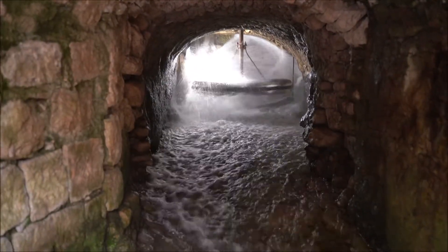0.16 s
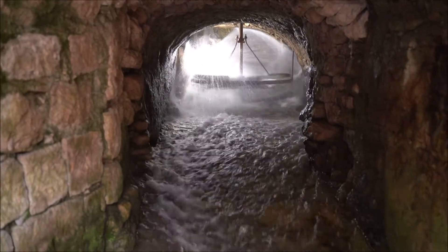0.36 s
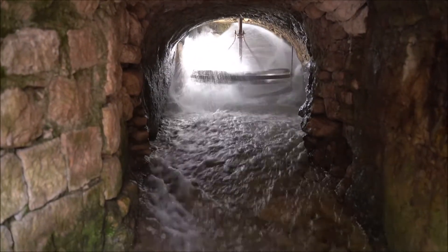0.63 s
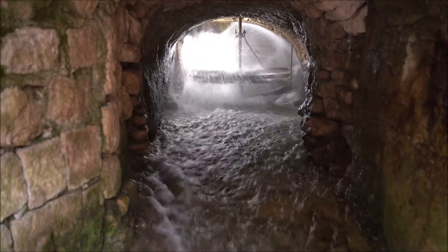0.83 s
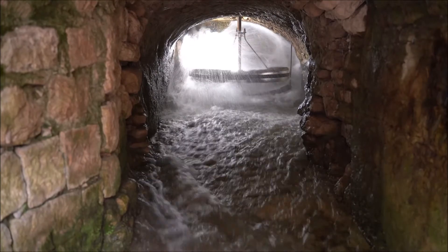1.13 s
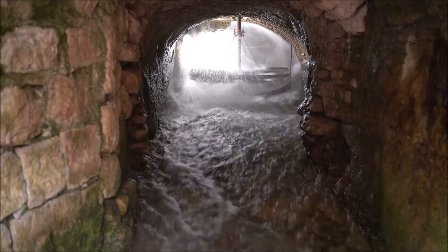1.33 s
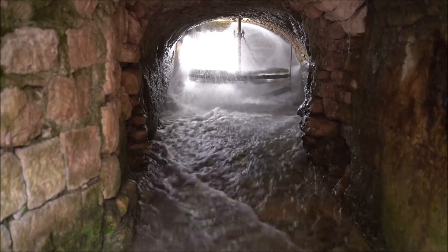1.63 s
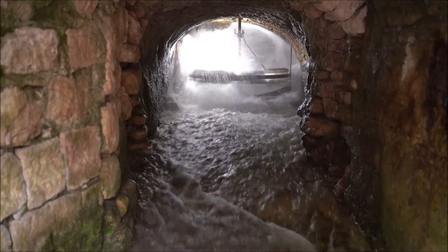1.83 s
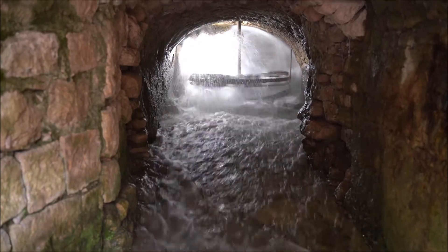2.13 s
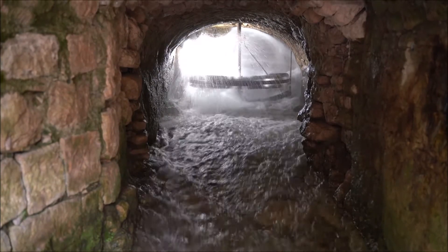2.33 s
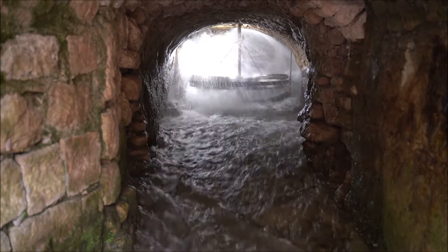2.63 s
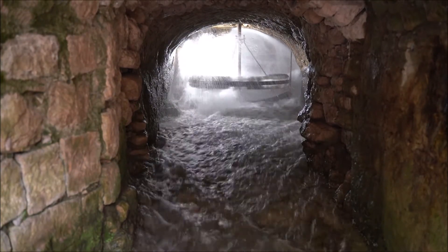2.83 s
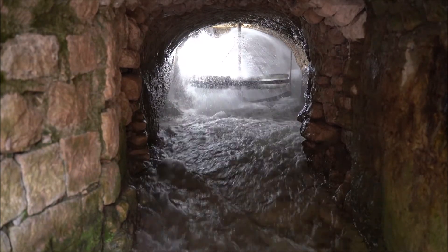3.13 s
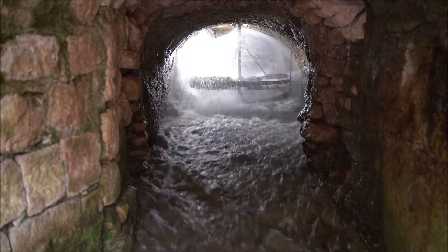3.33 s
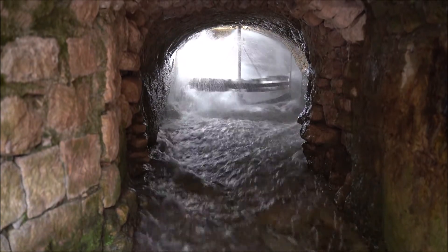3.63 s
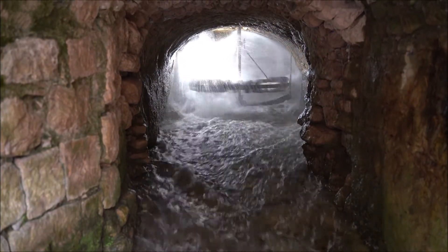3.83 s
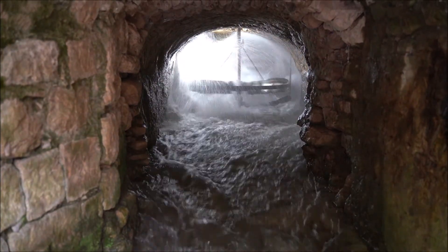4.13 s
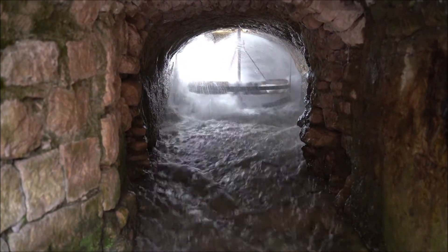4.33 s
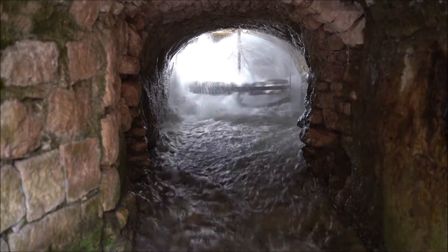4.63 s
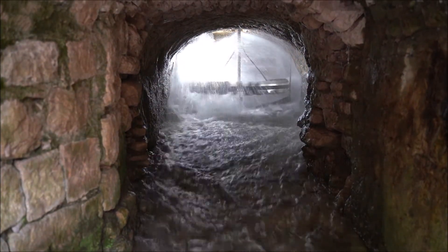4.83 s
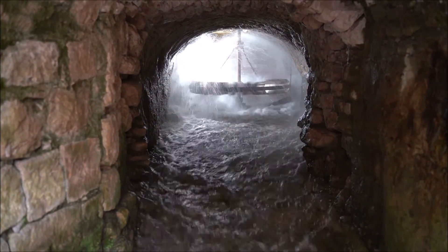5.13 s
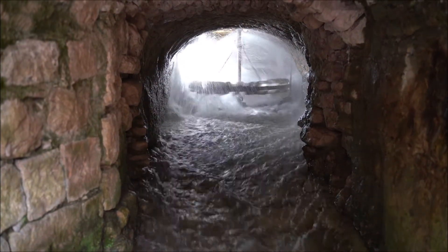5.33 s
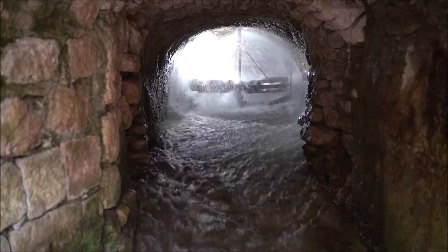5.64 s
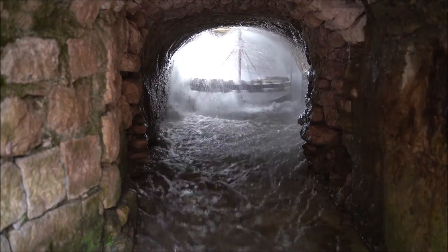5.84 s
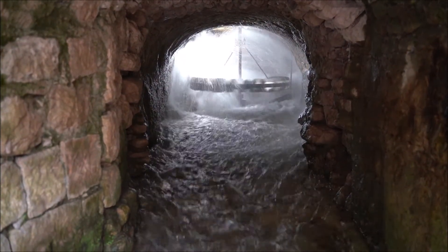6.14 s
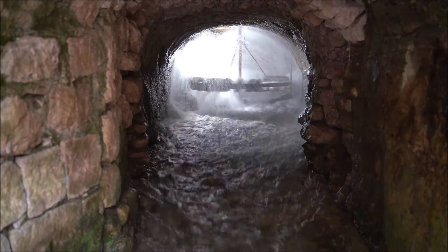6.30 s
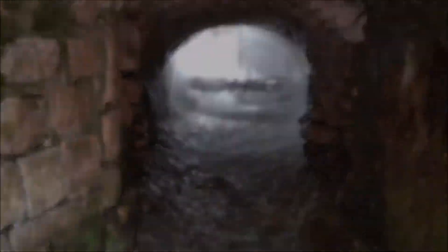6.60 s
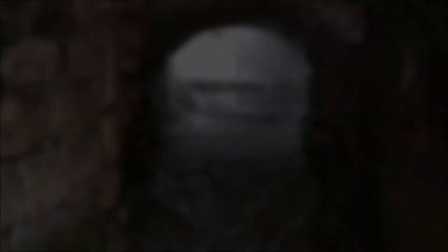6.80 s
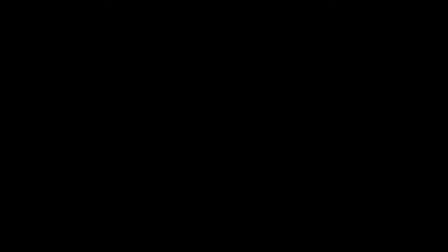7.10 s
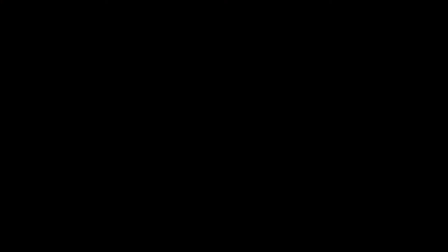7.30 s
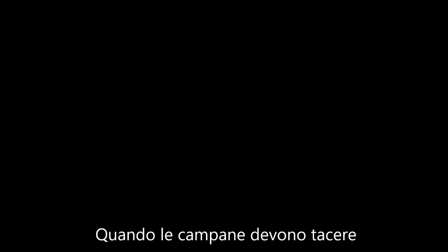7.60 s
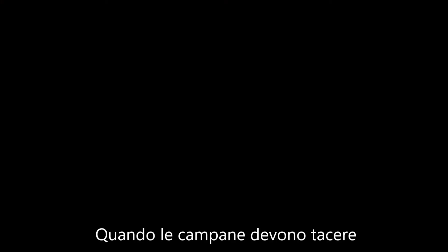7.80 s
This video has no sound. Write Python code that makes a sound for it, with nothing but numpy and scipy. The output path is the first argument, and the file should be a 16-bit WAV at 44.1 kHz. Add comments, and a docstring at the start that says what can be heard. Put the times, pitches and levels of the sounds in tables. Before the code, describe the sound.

Inside a stone vault, a water jet pounds a flat wheel at the far end and the outflow rushes along the channel. Low roar, churning wash and fine spray hiss sound together at once, with small bubbles and droplets buried in them. The torrent is dense and steady, coloured by the hollow vault, wide in stereo and slightly right. It fades evenly almost from the start, then cuts to silence near the end.

```python
"""A stone vault: a water jet drives a flat wheel at the far end and the tail race rushes out.
Roar, churning wash and spray hiss are noise from random spectra, with drifting patches and flicker.
Small bubbles and drops are scattered damped tones; a few brief tones swell and fade.
The vault's air modes colour it all and it leans right; an even fade ends in a quick stop, then silence.
"""
import sys
import numpy as np
from scipy import signal
from scipy.fft import rfft, irfft
from scipy.io import wavfile
from scipy.ndimage import uniform_filter1d

SR = 44100
rng = np.random.default_rng(int(sys.argv[2]) if len(sys.argv) > 2 else 0)


def materialize(psi):
    """Save the field psi as 16-bit PCM at rate SR to the path in sys.argv[1].

    A 1-D psi becomes a single channel; in a 2-D psi each row is a channel.
    """
    bounded = np.clip(np.atleast_2d(psi).T, -1, 1)
    quanta = np.round(bounded * 32767).astype(np.int16)
    wavfile.write(sys.argv[1], SR, quanta)


N = 351036

# Spectral shape of the low roar: (frequency [Hz], density [dB per Hz, relative])
ROAR_COLOUR = [(20, -26.5), (40, -25), (70, -9), (110, -7), (250, -5.5), (500, -6), (900, -14.5),
               (1800, -31)]
# Spectral shape of the churning wash: (frequency [Hz], density [dB per Hz, relative])
CHURN_COLOUR = [(150, -33), (400, -8.5), (700, -3), (1300, -2), (2300, -4.5), (3200, -8.5), (4200, -19),
                (7000, -32)]
# Spectral shape of the spray hiss: (frequency [Hz], density [dB per Hz, relative])
SPRAY_COLOUR = [(1200, -23), (2500, -1), (4000, 1.5), (6500, 0.5), (8500, -1), (11000, -3.5), (16000, -6.5)]
# Air modes of the vault, overlapping lifts and dips: (centre [Hz], width [Hz], gain [dB])
VAULT_MODES = [(86, 12, 1), (99, 6.3, -2.5), (109, 8, 2.5), (118, 8, -2.5), (169, 7.1, -3),
               (132.6, 14, 7.5), (157, 12, 5.5), (178, 18, 5), (226, 27, 4), (249.7, 14, -3), (272, 20, 2),
               (302, 20, 1.5), (345, 30, -3.5), (369, 14, 2.5), (387.2, 12, 6.5), (417, 16, 4),
               (444, 21, 2.5), (525, 40, 0), (610, 40, -1), (698, 20, 1), (727, 20, 0.5), (850, 50, -0.2),
               (1004, 100, 1.35), (1170, 60, -0.5), (1530, 80, -0.5)]
# Left-right likeness of the noise layers: (frequency [Hz], correlation [-1 to 1])
STEREO_LIKENESS = [(25, .62), (60, .84), (130, 0.95), (200, 0.84), (300, 0.75), (450, 0.61), (560, .4),
                   (680, .52), (800, 0.35), (1300, 0.35), (2000, 0.29), (3000, -0.008), (4200, -0.18),
                   (6000, -0.027), (15000, .04)]
# Stereo balance: (frequency [Hz], left minus right [dB])
STEREO_LEAN = [(60, 0), (92, -0.5), (140, 0), (210, -1.5), (330, -1), (500, -2.5), (770, -1.5),
               (1170, -1.5), (1790, -3), (2740, -1), (4190, -0.5), (6410, -2.5), (9810, -3.0), (15000, -2)]
# Brief tones, level before the vault and fade: (loudest moment [s], pitch [Hz], peak [dB], length [s])
BRIEF_TONES = [(.74, 1320, -27, .045), (1.704, 632, -22, .05), (3.798, 502, -21.5, 0.043),
               (3.962, 920, -24.5, 0.045), (4.53, 3150, -31, .04), (4.745, 1740, -27.5, .04),
               (5.75, 2710, -31, .04)]
# Slow level of the water, before each layer takes its share: (time [s], level [dB])
FLOW = [(0, -0.4), (.45, 0.2), (.95, .3), (1.25, -0.7), (1.7, -.5), (2.0, .3), (2.4, -0.3), (3.0, -.2),
        (3.7, .3), (3.9, -.3), (4.05, 0.5), (4.45, 0.1), (4.6, 0.7), (5.2, .1), (5.6, .5), (6.15, -0.2),
        (6.6, .5), (7.3, -.5)]
# Lurches of the roar, before the gain control: (time [s], lift [dB])
THUMPS = [(.1, 2.5), (.63, 2), (1.12, 2), (1.3, 1.5), (1.46, 1.5), (1.85, 2), (2.36, 1.8), (3.05, 2.5),
          (5.97, 2), (6.24, 2.2), (7.0, 2.8)]

# layer levels going into the vault [dB]
ROAR_DB, CHURN_DB, SPRAY_DB, BUBBLES_DB, DROPS_DB = -23, -23, -24, -37, -39
CHURN_FOLLOWS, SPRAY_FOLLOWS = 1.2, 0.9  # share of the flow's swing in dB
THUMP_S = 0.05  # from a lurch's centre to 1/e of its lift
HOLD_S, SQUEEZE = 0.06, 0.4  # gain control: averaging time, share of each swing taken back
FADE_FROM_S, FADE_TO_S, STOP_S = 0.37, 7.434, 7.355
EDGE_HZ = 15760  # upper band limit


def roar():
    """The jet pounding the wheel and the pool under it: low noise that lurches up in level."""
    wash = rush(ROAR_COLOUR, thumps_db, size=2048,
                patch_db=1.0, patch_hz=80, patch_s=0.06, flicker_db=0.2)
    return gain_of(ROAR_DB) * wash


def thumps_db(t):
    """Each lurch is a short rounded bump in level."""
    return sum(db * np.exp(-((t - s) / THUMP_S) ** 2) for s, db in THUMPS)


def churn():
    """Water tumbling down the channel, with trapped air ringing as bubbles."""
    wash = rush(CHURN_COLOUR, lambda t: CHURN_FOLLOWS * flow_db(t), size=1024,
                patch_db=0.88, patch_hz=400, patch_s=0.06, flicker_db=0.5)
    bubbles = grains(347.5, 2500, cycles=10.2, glide=0.06, per_s=150, spread_db=3.2, count=24)
    return gain_of(CHURN_DB) * wash + gain_of(BUBBLES_DB) * bubbles


def flow_db(t):
    """Slow level swing shared by the churning wash and the spray hiss."""
    return np.interp(t, *np.transpose(FLOW))


def brief_tones():
    """Each brief tone swells and fades while its pitch climbs very slightly."""
    t, out = np.arange(N) / SR, np.zeros(N)
    start_turns = rng.random(len(BRIEF_TONES))
    for (s, hz, db, length), start in zip(BRIEF_TONES, start_turns):
        near = slice(max(0, round((s - 2 * length) * SR)), round((s + 2 * length) * SR))
        u = (t[near] - s) / length  # time in tone lengths, 0 at the loudest
        swell = np.exp(-4 * u ** 2)
        turns = hz * length * u * (1 + 0.015 * u) + start
        out[near] += gain_of(db) * swell * np.sin(2 * np.pi * turns)
    return out


def spray():
    """Mist and droplets flung off the wheel against water and stone: fine hiss and tiny tones."""
    hiss = rush(SPRAY_COLOUR, lambda t: SPRAY_FOLLOWS * flow_db(t), size=512,
                patch_db=0.63, patch_hz=1460, patch_s=0.05, flicker_db=0.62)
    drops = grains(2370, 12000, cycles=3.6, glide=0.064, per_s=900, spread_db=4.0, count=16)
    return gain_of(SPRAY_DB) * hiss + gain_of(DROPS_DB) * drops


def vault(x):
    """The vault's air modes lift and dip narrow bands; the sound leans to the right."""
    hz = np.fft.rfftfreq(N, 1 / SR)
    modes_db = sum(db / (1 + (2 * (hz - f) / width) ** 2) for f, width, db in VAULT_MODES)
    lean_db = np.outer([0.5, -0.5], read(STEREO_LEAN, hz))
    return irfft(rfft(x) * gain_of(modes_db + lean_db), N)


def rush(colour, swell_db, size, patch_db, patch_hz, patch_s, flicker_db):
    """Dense noise from random short-time spectra, with drifting patches and a flicker shared by all pitches."""
    hop = size // 4
    hz, t = np.fft.rfftfreq(size, 1 / SR), np.arange(N // hop + 5) * hop / SR
    a, b, c, d, patches = rng.standard_normal((len(t), len(hz), 5)).T
    flicker = evened(uniform_filter1d(patches.mean(0), size=3))
    # smooth the patches along pitch, then along time
    patches = uniform_filter1d(patches, max(1, round(patch_hz / hz[1])), axis=0)
    patches = evened(uniform_filter1d(patches, max(1, round(patch_s / t[1])), axis=1))
    # the right side shares part of the left's noise
    same = np.clip(read(STEREO_LIKENESS, hz), -1, 1)[:, None]
    left = a + 1j * b
    right = same * left + np.sqrt(1 - same ** 2) * (c + 1j * d)
    level_db = read(colour, hz)[:, None] + patch_db * patches + flicker_db * flicker + swell_db(t)
    spectra = np.array([left, right]) * gain_of(level_db)
    return evened(signal.istft(spectra, nperseg=size, noverlap=size - hop)[1][:, :N])


def grains(low_hz, high_hz, cycles, glide, per_s, spread_db, count):
    """Short damped tones of rising pitch, scattered in time and across the channels; a few are large."""
    out = np.zeros((2, N))
    starts = rng.random(N) < per_s / SR
    size = gain_of(spread_db * np.minimum(rng.exponential(1, N), 4)) * starts
    kind = rng.integers(0, count, N)  # which pitch each grain takes
    side = rng.random(count) * np.pi / 2  # each pitch keeps one stereo place
    for k, hz in enumerate(np.geomspace(low_hz, high_hz, count)):
        turns = np.arange(round(3 * cycles / hz * SR)) / SR * hz
        tone = np.sin(2 * np.pi * turns * (1 + glide * turns / cycles))
        tone *= np.exp(-2 * turns / cycles)
        tone *= 1 - np.exp(-2 * turns)  # soft start
        voice = signal.oaconvolve(size * (kind == k), tone)[:N]
        out += np.outer([np.cos(side[k]), np.sin(side[k])], voice)
    return evened(out)


def gain_of(db):
    """Amplitude factor for a level in dB."""
    return 10 ** (np.asarray(db) / 20)


def evened(x):
    """Scale to an RMS of one."""
    return x / np.sqrt(np.mean(x ** 2) + 1e-20)


def read(points, hz):
    """Read a curve between its points along a log frequency axis."""
    f, value = np.transpose(points)
    return np.interp(np.log(hz + 1), np.log(f + 1), value)


def scene():
    """All the layers sounding together in the vault."""
    return vault(roar() + churn() + brief_tones() + spray())


def record(dry):
    """Gain control leans against level swings; an even fade ends in a quick stop; then the band limit."""
    t = np.arange(N) / SR
    r = np.exp(-1 / (HOLD_S * SR))
    power = (dry ** 2).mean(0)
    swing = signal.lfilter([1 - r], [1, -r], power / power.mean() - 1) + 1
    held = dry / swing ** (SQUEEZE / 2)  # half, as swing is in power
    fade = np.clip((FADE_TO_S - t) / (FADE_TO_S - FADE_FROM_S), 0, 1)
    stop = 1 / (1 + np.exp(np.clip((t - STOP_S) / 0.0035, -50, 50)))
    low_pass = signal.firwin(1023, EDGE_HZ, window=("kaiser", 9), fs=SR)
    return signal.oaconvolve(held * fade * stop, low_pass[None], "same")


dry = scene()
out = record(dry)
materialize(out)
```